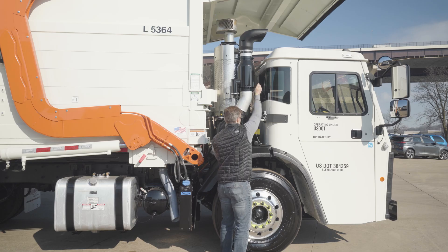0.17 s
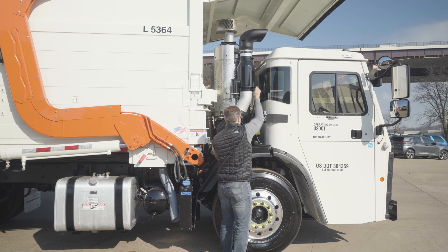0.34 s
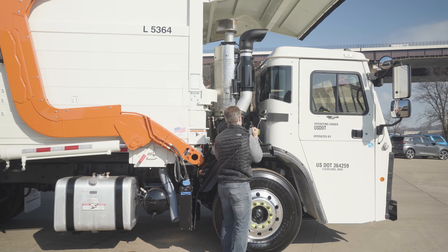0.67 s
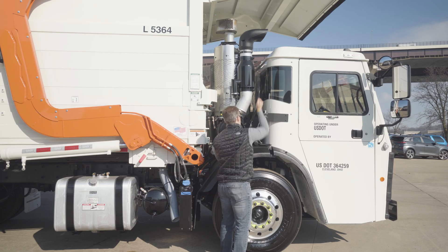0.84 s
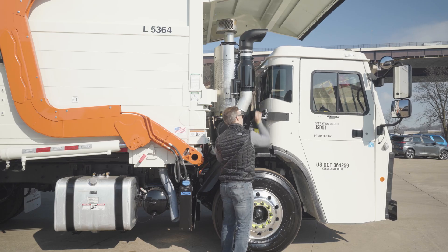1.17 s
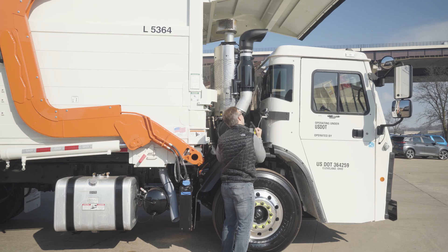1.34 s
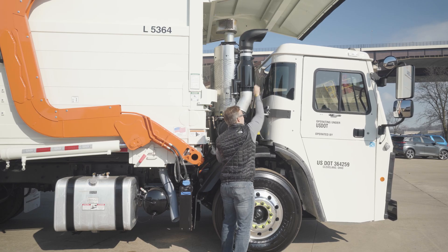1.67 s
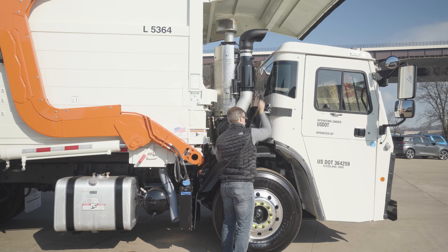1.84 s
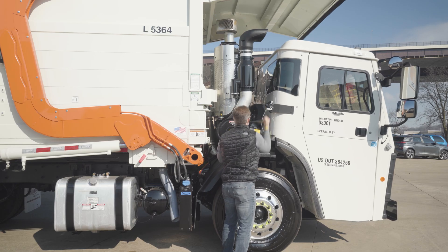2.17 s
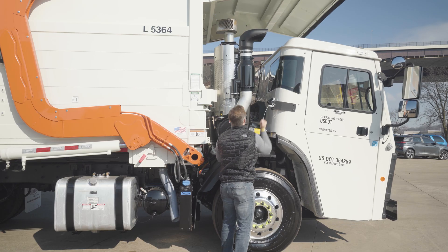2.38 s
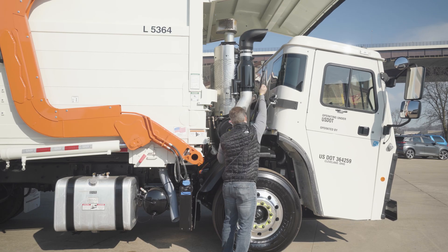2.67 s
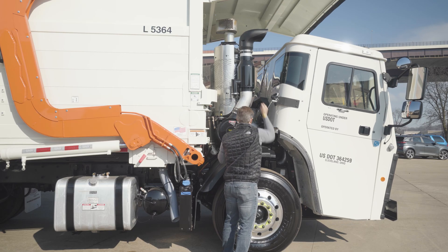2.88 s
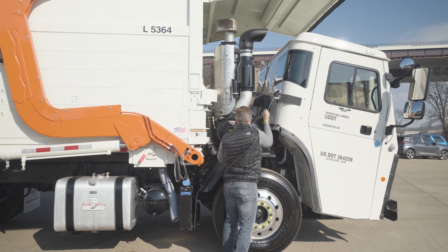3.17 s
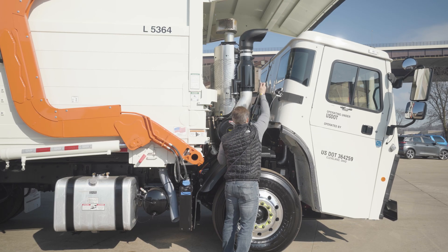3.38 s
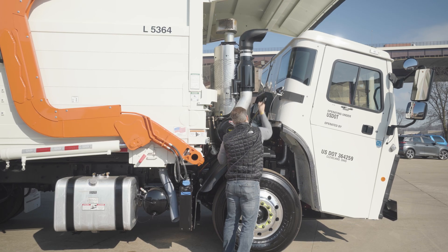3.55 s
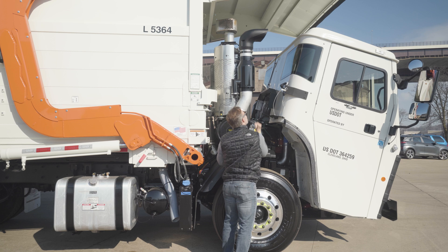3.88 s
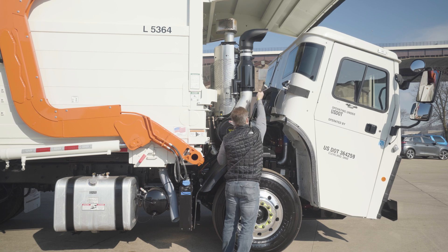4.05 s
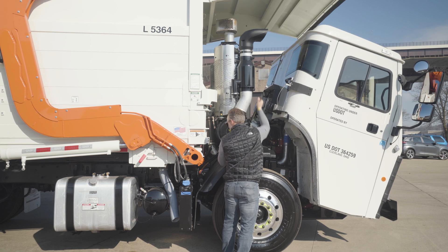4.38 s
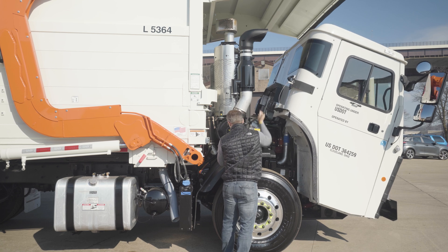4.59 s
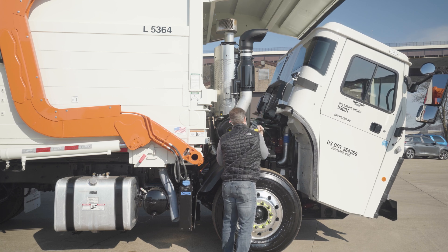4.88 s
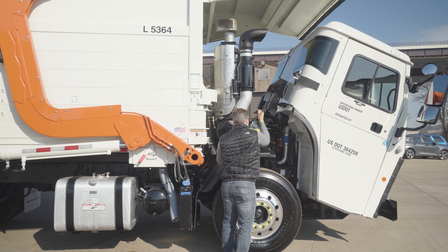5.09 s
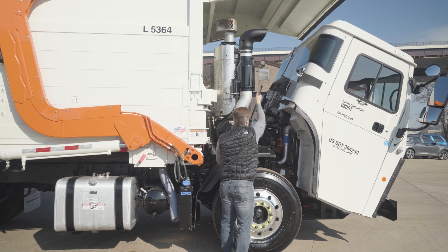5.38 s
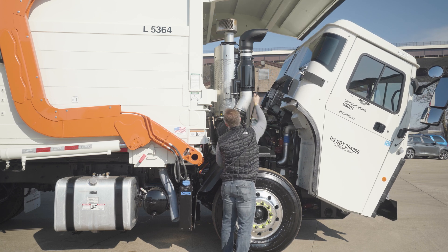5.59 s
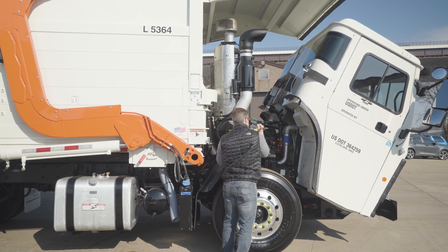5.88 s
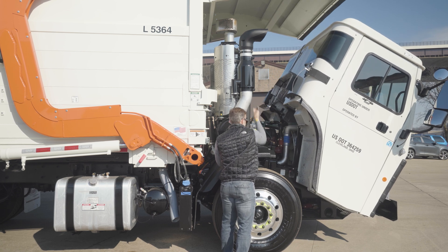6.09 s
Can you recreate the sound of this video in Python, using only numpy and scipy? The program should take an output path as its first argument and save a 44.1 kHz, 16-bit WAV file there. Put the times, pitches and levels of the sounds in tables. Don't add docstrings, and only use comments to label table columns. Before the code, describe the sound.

In an open yard, a steel lever is pumped by hand, heard close and dry with quick reflections from the truck side, ground and wall. A bright knock opens at 0 s, then the first sharp clank lands at 0.4 s. Full clanks follow near 1.2, 2.0, 2.6, 3.3, 4.0, 4.6, 5.3 and 6.0 s, with clattering top knocks between them, strong at 0.86 and 1.63 s and generally softer, more broken later. Little ticks precede each blow; loose washers shiver afterwards. Bracket and cab panels answer with short dull thuds and a low boom, deepest from 2 to 3.3 s. Between blows come faint oil rush, gritty seal rub, dry snaps, link scrapes and tiny early squeaks. Valve puffs hiss clearest at 2.5 and 3.2 s, with a faint long swell before 5.15 s. Distant traffic murmurs very low throughout.

```python
import sys
import numpy as np
from scipy import signal
from scipy.io import wavfile
from scipy.ndimage import uniform_filter1d

SR = 44100
rng = np.random.default_rng(int(sys.argv[2]) if len(sys.argv) > 2 else 0)


def transcribe(signal):
    frames = np.atleast_2d(signal).T
    limited = np.clip(frames, -1, 1)
    pcm = np.round(limited * 32767).astype(np.int16)
    wavfile.write(sys.argv[1], SR, pcm)


def volts_from_db(level):
    exponent = np.asarray(level, float) / 20
    return 10 ** exponent


N = 274743

TOUCH_SPREAD_DB, GRIP_DETUNE = 2.2, 0.035
FLICKER_DB = 0.9


def rms_one(x):
    return x / np.sqrt(np.mean(x ** 2) + 1e-20)


def early_one(rows):
    return rows / np.sqrt(uniform_filter1d(rows ** 2, size=130, axis=1).max(axis=1, keepdims=True))


def band(x, low_hz, high_hz, order=2):
    return signal.sosfilt(signal.butter(order, [low_hz, high_hz], "band", fs=SR, output="sos"), x)


def high_pass(x, hz, order):
    return signal.sosfilt(signal.butter(order, hz, "high", fs=SR, output="sos"), x)


def drift(rate_hz):
    r = np.exp(-80 * np.pi * rate_hz / SR)
    slow = signal.lfilter([1], [1, -2 * r, r * r], rng.standard_normal(N // 40 + 2002))
    slow = rms_one(slow[2000:])
    return np.interp(np.arange(N) / 40, np.arange(len(slow)), slow)


def coloured(spectrum, patchy_db):
    hz_points, db_points = np.transpose(spectrum)
    edges = 25 * 2 ** np.arange(0, 9.4, 1 / 3)
    together = drift(38)
    white = rng.standard_normal((2, N))
    out = 0
    for k, (low, high) in enumerate(zip(edges, edges[1:])):
        if hz_points[0] < high and low < hz_points[-1]:
            level_db = np.interp(np.log(low * high) / 2, np.log(hz_points), db_points)
            flicker_db = patchy_db * (0.78 * together + drift(24))
            out = out + volts_from_db(level_db + flicker_db) * band(white[k % 2], low, high)
    return rms_one(out)


def struck(force, modes, spread_db, detune=0):
    luck = rng.standard_normal((len(force), len(modes), 2))
    longest_s = max(m[2] for m in modes)
    t = np.arange(min(force.shape[1], round(longest_s * SR))) / SR
    ring = 0
    for k, (hz, level_db, t60) in enumerate(modes):
        height = volts_from_db(level_db + spread_db * luck[:, k, :1] - 60 * t / t60) / np.sqrt(t60)
        ring = ring + height * np.sin(2 * np.pi * hz * (1 + detune * luck[:, k, 1:]) * t)
    return early_one(signal.fftconvolve(force, ring, axes=1)[:, :force.shape[1]])


def place(times, rows):
    out = np.zeros(N + rows.shape[1])
    for s, row in zip(times, rows):
        i = max(round(s * SR), 0)
        out[i:i + len(row)] += row
    return out[:N]


def yard():
    # (frequency [Hz], level per Hz [dB])
    traffic = [(22, -27), (35, -8), (50, -11), (66, 4), (85, -5), (140, -1.5), (260, -11), (516, -15),
               (800, -18.5), (1160, -25), (1500, -33), (2350, -32), (5880, -47.5), (15500, -69)]
    return volts_from_db(-50) * coloured(traffic, patchy_db=1.4)


def contacts():
    # (time [s], clank [dB], ring [Hz])
    nudges = [(0.0, -52, 4150), (0.7574, -51.5, 2430), (0.769, -51, 4660), (1.129, -63.5, 4440),
              (1.5263, -54, 2540), (1.546, -47.5, 2900), (1.922, -65, 4900), (2.019, -44.5, 3000),
              (2.152, -57, 4000), (2.917, -58, 2530), (4.2345, -54, 2740), (4.252, -57, 3020),
              (4.274, -56, 3020), (4.906, -53, 5540), (4.919, -57, 5380), (5.565, -73, 4000),
              (5.6033, -65, 5630), (5.965, -63.5, 4500), (5.618, -51, 5500)]
    # (time
    # [s], clank [dB], ring [Hz], chatter t60 [s])
    knocks = [(0.0156, -31, 4000, 0.054), (0.0188, -26, 5080, 0.024), (.0235, -22, 10460, 0.034),
              (0.841, -34.5, 8040, 0.065), (0.8573, -22, 5300, .02), (.8595, -16, 2830, 0.03),
              (1.625, -32, 7700, 0.082), (1.6338, -15.5, 4020, 0.038), (2.3147, -34, 7940, 0.059),
              (2.3243, -27.5, 3000, 0.087), (2.3317, -19, 4950, 0.028), (2.6465, -22.5, 7500, .03),
              (2.9835, -22, 8000, 0.081), (2.998, -30.5, 4950, 0.05), (3.5705, -41.5, 3400, 0.015),
              (3.572, -31.5, 12900, 0.034), (3.675, -35, 4170, 0.091), (3.682, -30, 2800, 0.061),
              (3.688, -30.5, 4630, 0.017), (4.3098, -38.5, 4100, 0.068), (4.3132, -29.5, 3700, 0.012),
              (4.3241, -28.5, 2830, 0.046), (4.975, -41, 11900, 0.065), (4.9815, -26.5, 2720, 0.049),
              (4.9958, -30.5, 3200, 0.037), (5.6825, -37.5, 13350, 0.094), (5.6873, -39, 5200, 0.14),
              (5.692, -32.5, 2700, 0.072), (5.707, -25.5, 9030, 0.024)]
    # (time [s], tick [dB])
    shivers = [(.034, -41), (.452, -35), (.462, -44), (.498, -54), (1.243, -46), (1.259, -40), (1.306, -45),
               (1.671, -45), (1.94, -43), (1.98, -28), (1.992, -30.5), (2.006, -38), (2.103, -44),
               (2.302, -31.5), (2.342, -44), (2.607, -41), (2.665, -25), (2.672, -27.5), (2.712, -41),
               (3.047, -55), (3.273, -47), (3.281, -47), (3.326, -30), (3.384, -44), (3.618, -54),
               (3.991, -28.5), (4.0, -29), (4.061, -45), (4.256, -52), (4.266, -44), (4.292, -39),
               (4.353, -45), (4.365, -43.5), (4.642, -26.5), (4.658, -29.5), (4.928, -48), (4.96, -38),
               (4.99, -34), (5.346, -31), (5.4, -38), (5.7, -36), (6.105, -36.5)]
    # (time [s], tick [dB])
    turns_down = [(.3595, -40.5), (.3662, -35), (1.176, -45.5), (1.19, -41.5), (1.928, -41), (1.9352, -37),
                  (2.6043, -41), (3.2597, -50), (3.2684, -32.5), (3.938, -39.5), (3.945, -47),
                  (3.954, -40.5), (4.6, -41), (5.274, -40), (5.981, -42), (5.9883, -48)]
    # (time [s], tick [dB])
    seatings = [
        (.4024, -30),
        (1.2258, -17.5),
        (1.963, -20.5),
        (2.6352, -16.5),
        (3.298, -20.5),
        (3.968, -23.5),
        (4.624, -23),
        (5.3104, -24),
        (6.0194, -22),
    ]
    # (time [s], clank under 7 kHz [dB], tick over 7 kHz [dB], strongest ring [Hz])
    landings = [
        (0.4129, -21, -14.5, 5300),
        (1.2318, -18.5, -19, 4500),
        (1.9707, -18, -18, 4160),
        (2.642, -18, -14, 5090),
        (3.306, -20, -18, 3080),
        (3.976, -19.5, -19.5, 2660),
        (4.63, -21, -19, 11000),
        (5.319, -19.5, -17.5, 5080),
        (6.028, -20, -18.5, 5200),
    ]
    # (time [s], tick [dB])
    rebounds = [(.439, -31), (.4837, -44), (.4979, -59), (1.2626, -58), (1.2902, -37), (1.4424, -47),
                (2.0379, -36), (2.0987, -41), (2.7016, -38), (3.0386, -47), (3.3355, -32), (3.3656, -45),
                (3.6015, -39), (4.008, -33), (4.0326, -43), (4.0518, -38.5), (4.1065, -52), (4.6912, -38),
                (5.3798, -43), (5.7453, -44), (6.083, -38), (6.0966, -44)]
    # (time [s], tick [dB])
    slides_up = [(.8077, -40), (.8214, -35.5), (1.5644, -40.5), (1.5746, -48), (1.598, -37),
                 (1.6044, -33.5), (2.2623, -37.5), (2.2977, -32.5), (2.9306, -39), (2.9573, -34),
                 (2.9676, -34), (3.6403, -43), (3.6514, -35), (4.2839, -29), (4.9293, -59), (4.9557, -32.5),
                 (5.6597, -44)]

    rows = [(s, clank_db, tick_db, hz, 0.042, -5, 1) for s, clank_db, tick_db, hz in landings]
    rows += [(s, db, db + 2, hz, t60, -3, 0.93) for s, db, hz, t60 in knocks]
    rows += [(s, db, db - 6, hz, 0.042, -3, 0.33) for s, db, hz in nudges]
    # clank dB from tick, ring Hz, chatter t60 s, ring dB, sharpness of the edge 0-1
    kinds = [(seatings, -10, 9800, 0.07, -12, 0.5),
             (turns_down, -14, 11500, 0.075, -9, 0.15),
             (slides_up, -14, 8500, 0.08, -5, 0.25),
             (rebounds, -8, 10700, 0.07, -11, 0.25),
             (shivers, -14, 10500, 0.052, -11, 0.1)]
    for touches, clank_db, hz, t60, ring_db, edge in kinds:
        for s, db in touches:
            ring_hz = hz * (1 + 0.07 * rng.standard_normal())
            rows.append((s, db + clank_db, db, ring_hz, t60, ring_db, edge))
    return rows


def lever():
    # (frequency [Hz], level [dB], t60 [s])
    low_modes = [(2550, -6, .012), (2830, -2, .015), (3230, -1, .022), (3770, -2, .02), (4150, -1, .015),
                 (4520, -1, .02), (5050, 0, .018), (5450, 1, .025), (6400, -2, .018)]
    # (frequency [Hz], level [dB], t60 [s])
    high_modes = [(7600, -5, .012), (8500, -2, .025), (9300, -2, .015), (10300, 0, .02), (10800, -2, .015),
                  (11600, -3, .02), (12700, -3, .015), (13500, -5, .012), (14500, -6, .012)]
    s, clank_db, tick_db, ring_hz, t60, ring_db, edge = np.array(contacts()).T[:, :, None]
    t = np.arange(5000) / SR
    edge = edge.clip(0, 1)

    clump_db = 2.6 * np.repeat(rng.standard_normal((len(s), 100)), 50, axis=1)
    slips = rng.standard_normal((len(s), len(t))) * volts_from_db(clump_db)
    closing = 1 - (1 - 1.07 * edge) * np.exp(-t / 0.00083)
    dying = volts_from_db(-60 * t / np.clip(t60, 0.004, 0.2))
    click = 1.56 * edge * np.exp(-t / 0.00042)
    chatter = slips * (closing * dying + click)

    clank = struck(chatter, low_modes, TOUCH_SPREAD_DB, GRIP_DETUNE)
    clank += 1.1 * early_one(band(chatter, 2100, 6900, order=3))
    tick = struck(chatter, high_modes, TOUCH_SPREAD_DB, GRIP_DETUNE)
    tick += 1.316 * early_one(band(chatter * volts_from_db(-80 * t), 7400, 18900, order=3))

    song = np.sin(2 * np.pi * ring_hz * t[:1500]) * volts_from_db(-60 * t[:1500] / 0.015)
    song = early_one(signal.fftconvolve(chatter, song, axes=1)[:, :len(t)])
    touch_db = np.where(ring_hz < 7000, clank_db, tick_db)
    song_db = touch_db + ring_db - 8 + 0.44 * np.clip(-17.0 - touch_db, 0, 25)
    body = 0.5 * (clank * volts_from_db(clank_db) + tick * volts_from_db(tick_db))
    return place(s[:, 0], body + song * volts_from_db(song_db))


def echoes(x):
    # (delay [s], level [dB])
    paths = [
        (0.009, -4),
        (0.021, -16.5),
        (0.037, -23),
        (.061, -37.5),
        (.09, -44),
    ]
    t = np.arange(6000) / SR
    smear = rng.standard_normal(len(t))
    answer = 0
    for s, db in paths:
        answer = answer + volts_from_db(db) * np.exp(-((t - s) / (0.2 * s)) ** 2) / np.sqrt(s * SR)
    return signal.lfilter([0.6], [1, -0.4], signal.fftconvolve(x, answer * smear)[:N])


def flow():
    # (start [s], rush [dB], rush at rest [dB], seal rub at rest [dB])
    refilling = [
        (0.0, -51.5, -80, -83),
        (.79, -60.5, -71.5, -70),
        (1.59, -61, -73, -69),
        (2.29, -70, -68.5, -92),
        (2.945, -57.5, -74.5, -86),
        (3.63, -66, -74, -76),
        (4.26, -58, -74, -73),
        (4.94, -73, -75, -68),
        (5.64, -66, -80, -79.5),
    ]
    # (start [s], rush [dB], hold [s], seal rub at the end of the hold [dB])
    pressing = [
        (0.405, -59.5, 0.29, -63),
        (1.22, -61, 0.23, -61.5),
        (1.948, -59.5, 0.21, -58.5),
        (2.635, -56.5, 0.13, -68),
        (3.302, -56.5, 0.084, -76),
        (3.952, -61, 0.17, -78),
        (4.614, -55, 0.073, -56.5),
        (5.3, -55.5, 0.068, -59),
        (6.01, -56.5, .13, -57),
    ]
    ends = [row[0] for row in refilling[1:]] + [N / SR + 0.1]
    onset_s, onset_rub_db = 0.042, -12.5
    rows = []
    for refill, press, end_s in zip(refilling, pressing, ends):
        up_s, up_db, rest_db, rest_rub_db = refill
        down_s, down_db, hold_s, rub_db = press
        rows += [(up_s, up_db, up_db + onset_rub_db),
                 (up_s + 0.083, -67, -72),
                 (down_s - onset_s, rest_db, rest_rub_db),
                 (down_s, down_db, down_db + onset_rub_db),
                 (down_s + hold_s, down_db - 1, rub_db),
                 (end_s - onset_s, -75.5, -84.5)]
    return rows


def oil():
    # (frequency [Hz], level per Hz [dB])
    rush_spectrum = [(900, -9.5), (1500, -14), (2200, -14.5), (3200, -10), (4400, -15), (5400, -11),
                     (7000, -20), (9000, -16.5), (12000, -16)]
    # (frequency [Hz], level per Hz [dB])
    rub_spectrum = [(3000, -44.5), (6000, -19), (8500, -5.5), (10500, 3), (12000, -2), (14000, 1.5),
                    (15800, -14.5)]
    # (peak [s], rise [s], fall [s], level [dB])
    puffs = [
        (0.661, 0.02, 0.02, -56),
        (1.075, 0.054, 0.011, -59),
        (1.845, 0.028, 0.038, -54),
        (2.53, 0.034, 0.023, -47),
        (3.205, 0.041, 0.016, -49),
        (4.45, 0.048, 0.018, -64),
        (5.151, 0.17, 0.013, -61.5),
    ]
    t = np.arange(N) / SR
    s, rush_db, rub_db = np.transpose(flow())
    rush = volts_from_db(np.interp(t, s, rush_db) + 2.0) * coloured(rush_spectrum, patchy_db=1.8)
    rub = volts_from_db(np.interp(t, s, rub_db) + 5.5) * coloured(rub_spectrum, patchy_db=FLICKER_DB)

    valve_hz, width_hz = 10800, 1600
    jet = band(rng.standard_normal(N), valve_hz - width_hz / 2, valve_hz + width_hz / 2, order=3)
    opening = 0
    for at, rise, fall, db in puffs:
        opening = opening + volts_from_db(db) * np.exp(-((t - at) / np.where(t < at, rise, fall)) ** 2)
    return (rush + rub) * volts_from_db(FLICKER_DB * drift(90)) + opening * rms_one(jet)


def blows():
    # (time [s], panel [dB], boom [dB], bracket [dB])
    tugs_up = [
        (.02, -16.5, -54, -38),
        (0.859, -19.5, -53, -33),
        (1.636, -17, -68, -33.5),
        (2.329, -23.5, -32.5, -33.5),
        (2.986, -15.5, -39, -27.5),
        (3.685, -21.5, -40.5, -41),
        (4.313, -21, -50, -32),
        (4.981, -23, -37.5, -29.5),
        (5.694, -17.5, -39.5, -35),
    ]
    # (time [s], panel [dB], boom [dB], socket [dB], bracket [dB])
    shoves_down = [
        (.414, -14.5, -29.5, -28.5, -33),
        (1.227, -15.5, -32, -30, -28),
        (1.969, -13, -25, -29.5, -32),
        (2.642, -16, -24, -25, -32.5),
        (3.304, -14.5, -24.5, -38.5, -30.5),
        (3.977, -14, -29, -26.5, -35.5),
        (4.634, -20.5, -27.5, -27, -35),
        (5.315, -18, -27.5, -30, -32),
        (6.025, -16.5, -28, -39.5, -35),
    ]
    # (time [s], panel [dB], bracket [dB], socket [dB])
    slacks = [
        (0.768, -31, -48, -54),
        (0.838, -24, -44, -61),
        (1.132, -42, -41.5, -45.5),
        (1.607, -26, -44, -52),
        (2.26, -43, -41, -54),
        (3.938, -54, -42, -52),
    ]
    rows = [(s, panel_db, boom_db, bracket_db, socket_db, 0.011)
            for s, panel_db, boom_db, socket_db, bracket_db in shoves_down]
    rows += [(s, panel_db, boom_db, bracket_db, bracket_db - 11.5, 0.016)
             for s, panel_db, boom_db, bracket_db in tugs_up]
    rows += [(s, panel_db, -61, bracket_db, socket_db, 0.0091)
             for s, panel_db, bracket_db, socket_db in slacks]
    return rows


def truck():
    # (frequency [Hz], level [dB], t60 [s])
    boom = [(147, -7.5, 0.073), (167.5, 1.5, 0.16), (185.2, -6, 0.5), (217.9, -0.5, 0.24)]
    # (frequency [Hz], level [dB], t60 [s])
    bracket = [(470, -1, 0.09), (499, 5, 0.08), (541, 2, 0.09)]
    # (frequency [Hz], level [dB], t60 [s])
    socket = [(1154, -9.5, 0.11), (1190, -8, 0.051), (1286, -2, 0.073)]
    # (frequency [Hz], level [dB], t60 [s])
    panel = [(695, -3, .06), (760, -4, .06), (820, -4, .06), (890, -4, .06), (980, -7, .05),
             (1060, -9, .05), (1400, -9, .04), (1800, -9, .04)]
    s, panel_db, boom_db, bracket_db, socket_db, build_s = np.array(blows()).T[:, :, None]
    t = np.arange(15000) / SR
    noise = rng.standard_normal((len(s), len(t)))

    def shove(share, bounce_hz=0, bounce=0):
        x = t / (share * np.clip(build_s, 0.003, 0.03))
        return (noise + bounce * np.cos(2 * np.pi * bounce_hz * t)) * x * np.exp(-x)

    rows = struck(shove(1.35, bounce_hz=205.4, bounce=0.25), boom, 1.0, 0.009) * volts_from_db(boom_db)
    rows += struck(shove(0.99, bounce_hz=505.5, bounce=0.18), bracket, 1.6, 0.017) * volts_from_db(bracket_db - 1.5)
    rows += struck(shove(0.38, bounce_hz=1199, bounce=0.34), socket, 3.1, 0.014) * volts_from_db(socket_db - 3.2)
    rows += struck(shove(0.83), panel, TOUCH_SPREAD_DB, GRIP_DETUNE) * volts_from_db(panel_db - 21.5)
    rows += early_one(band(shove(1.8), 280, 720)) * volts_from_db(panel_db - 29.5)
    return high_pass(place(s[:, 0], rows), 125, order=4)


def far_parts():
    # (frequency [Hz], level [dB], t60 [s])
    tank = [(257, -3.5, .1), (313.5, -1, 0.088), (361.4, 2, 0.13), (390.5, -7, 0.06)]
    # (frequency [Hz], level [dB], t60 [s])
    step = [(591, -4.5, 0.057), (634, 3, 0.12), (690, -13, 0.06)]
    # (frequency [Hz], level [dB], t60 [s])
    clamp = [(1484, -5.5, 0.018), (1677, 1.5, .025), (1857, 1.5, .02)]
    # (time [s], tank [dB], step [dB], clamp [dB])
    draws = [(.02, -44.5, -39.5, -32.5), (.414, -37.5, -36, -53), (.859, -69, -42, -59),
             (1.227, -32, -30, -55), (1.634, -40, -49, -33.5), (1.969, -38.5, -43, -57),
             (2.335, -35.5, -46, -36), (2.642, -36.5, -46, -43), (2.995, -37, -37.5, -43),
             (3.304, -36.5, -37, -38.5), (3.685, -38.5, -44, -43), (3.976, -32, -37, -43.5),
             (4.313, -35, -37, -37.5), (4.633, -37.5, -34.5, -43), (4.99, -33.5, -30, -42),
             (5.315, -32.5, -34.5, -37), (5.694, -41.5, -33.5, -38.5), (6.025, -39, -38.5, -42)]
    s, *levels_db = np.array(draws).T[:, :, None]
    t = np.arange(9000) / SR
    rows = 0
    for modes, build_s, db in zip((tank, step, clamp), (0.017, 0.0074, 0.0036), levels_db):
        force = rng.standard_normal((len(s), len(t))) * t * np.exp(-t / build_s)
        rows = rows + struck(force, modes, 2.2, 0.016) * volts_from_db(db)
    return place(s[:, 0], rows)


def snaps():
    # (time [s], tick [dB])
    releases = [(.2, -47), (.229, -35), (.24, -48), (.267, -67), (.297, -69), (.348, -57), (2.12, -34),
                (2.131, -40), (2.142, -40), (2.164, -48), (2.179, -35.5), (2.831, -48), (2.838, -40),
                (2.877, -53), (2.884, -51), (3.44, -44), (4.761, -40), (5.025, -40), (5.051, -43),
                (5.095, -44), (5.106, -43), (5.152, -56), (5.166, -58), (5.605, -38), (5.781, -48),
                (5.801, -50), (5.813, -50), (5.836, -50), (6.163, -37)]
    s, db = np.array(releases).T[:, :, None]
    t = np.arange(400) / SR
    snap_s = 0.0003
    burst = rng.standard_normal((len(s), len(t))) * t * np.exp(-t / snap_s)
    return place(s[:, 0] - 2 * snap_s, early_one(band(burst, 5500, 21600)) * volts_from_db(db - 6.5))


def friction():
    # (start [s], length [s], level [dB], frequency [Hz])
    squeaks = [
        (0.54, 0.098, -61, 1180),
        (0.35, 0.074, -61, 3400),
        (0.94, 0.034, -64, 2600),
        (1.6, .08, -64.5, 5600),
    ]
    # (start [s], length [s], level [dB])
    drags = [(0.757, .045, -59), (1.18, .045, -63), (3.93, 0.036, -55), (4.22, .05, -79), (0.81, 0.06, -55),
             (1.553, 0.064, -65), (2.247, 0.051, -57), (2.93, 0.066, -53), (3.65, 0.045, -58),
             (4.263, 0.051, -57), (4.903, 0.071, -59), (5.61, 0.1, -63)]
    # (frequency [Hz], width [Hz], level [dB])
    guide_bands = [(2920, 360, -7), (4000, 940, -21), (5300, 330, 2), (8800, 500, -3)]
    t = np.arange(N) / SR
    slips = rng.random(N) < 1200 / SR
    strength = volts_from_db(4.5 * rng.exponential(1, N).clip(0, 4))
    grit = rms_one(slips * strength * rng.choice([-1, 1], N) + 1e-9)

    def swell(s, length, db):
        return volts_from_db(db) * np.sqrt(np.sin(np.pi * np.clip((t - s) / length, 0, 1)).clip(0))

    guide = sum(volts_from_db(db) * band(grit, hz - width / 2, hz + width / 2, order=1)
                for hz, width, db in guide_bands)
    out = rms_one(guide) * sum(swell(*row) for row in drags)
    for s, length, db, hz in squeaks:
        out += swell(s, length, db) * rms_one(band(grit, hz - 31.5, hz + 31.5, order=1))
    return out


def scene():
    metal = high_pass(lever(), 900, order=2) + friction()
    pump = metal + echoes(metal) + snaps() + oil()
    return (pump + truck() + far_parts() + yard())[None]


def band_limit(x):
    return signal.sosfilt(signal.butter(12, 16960, fs=SR, output="sos"), x)


def record(dry):
    rounded = 0.7 * np.tanh(dry / 0.7)
    top_cut = signal.cheby2(12, 45, 15800 * 1.02, fs=SR, output="sos")
    return band_limit(signal.sosfilt(top_cut, rounded))


dry = scene()
out = record(dry)
transcribe(out)
```